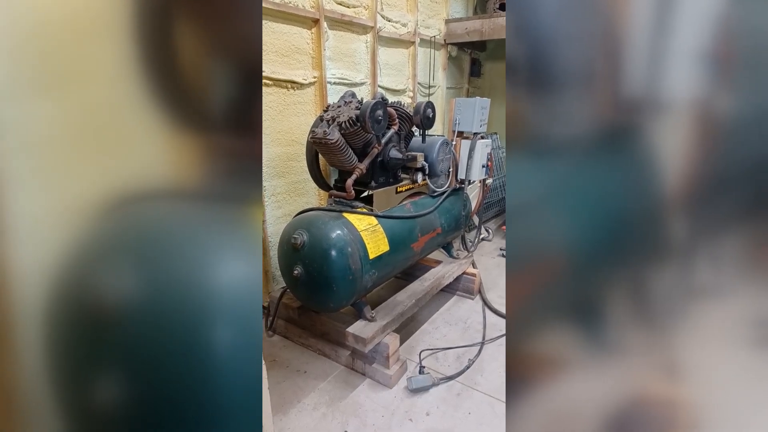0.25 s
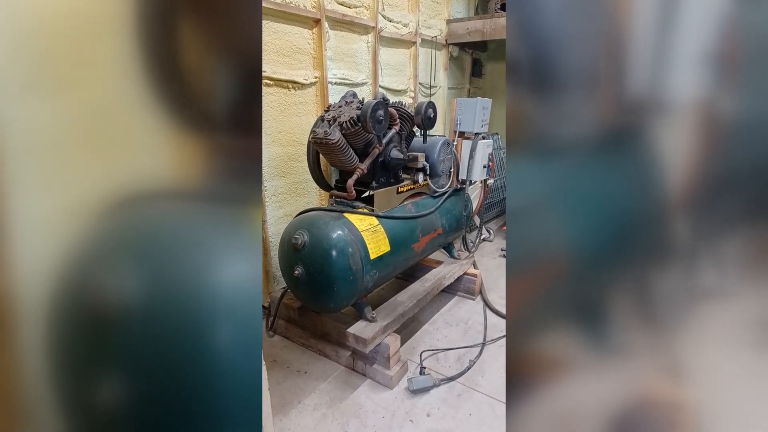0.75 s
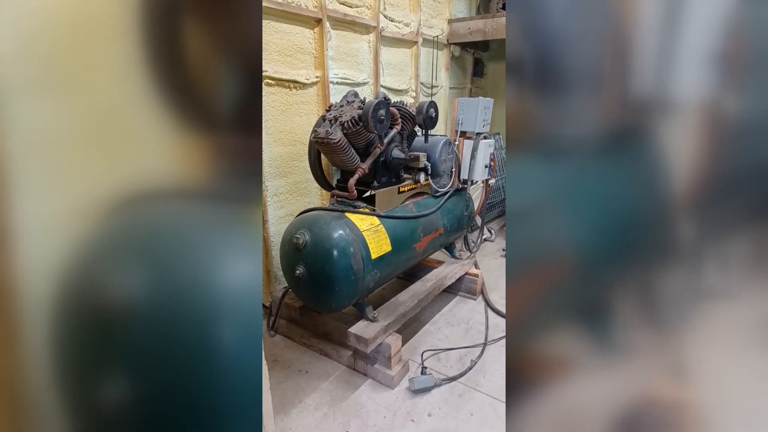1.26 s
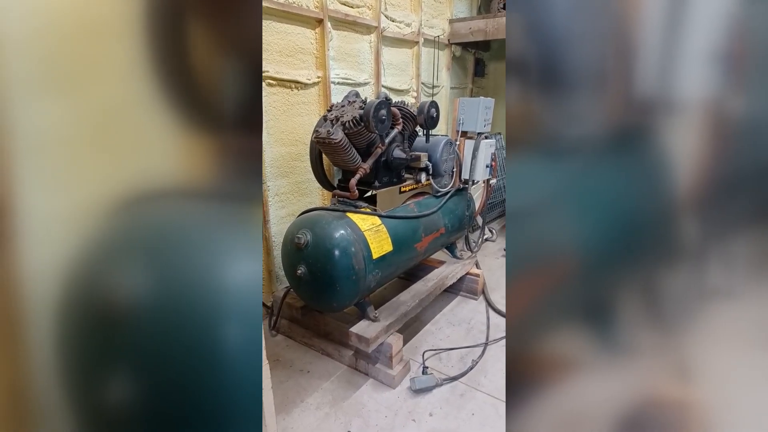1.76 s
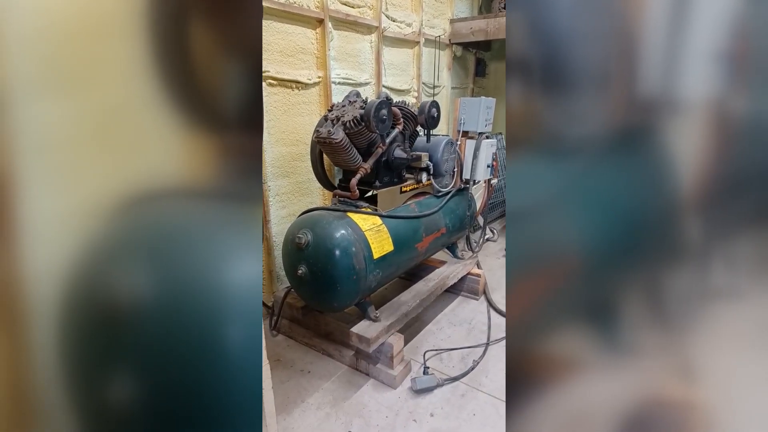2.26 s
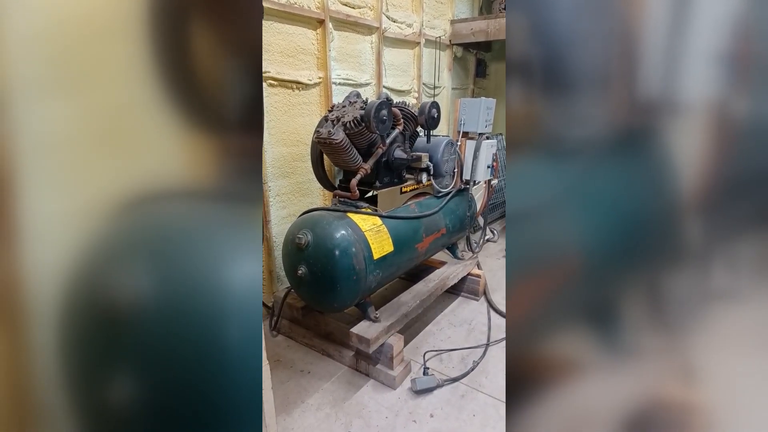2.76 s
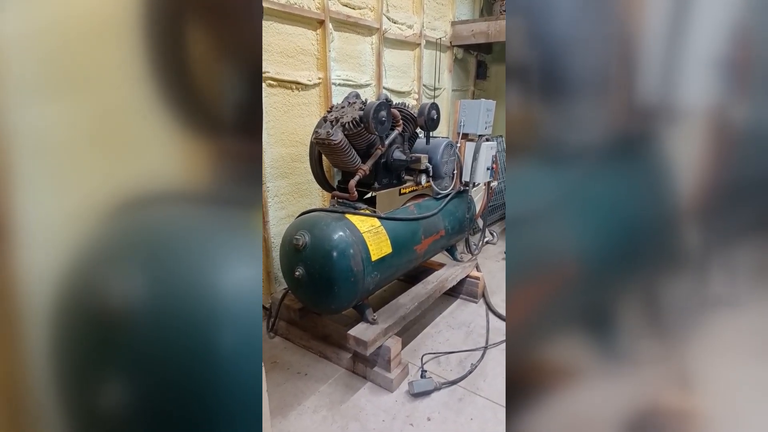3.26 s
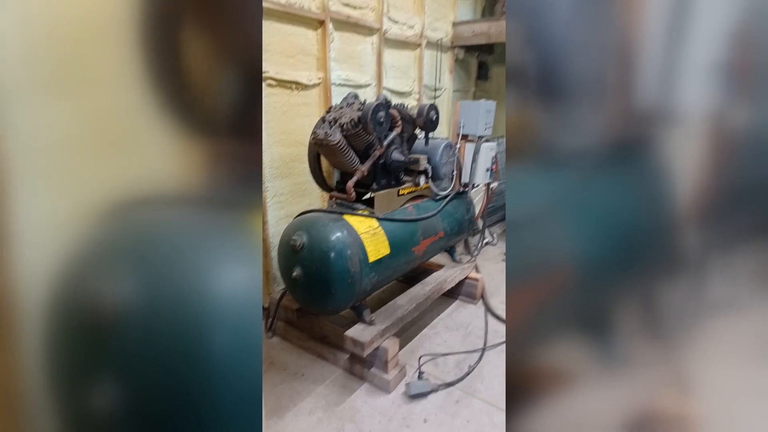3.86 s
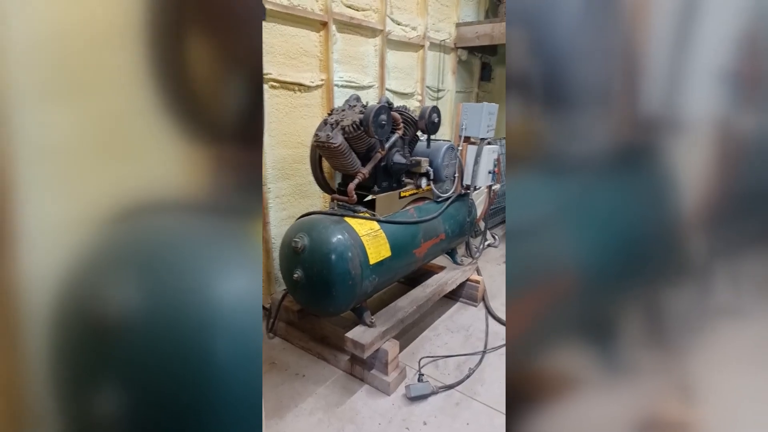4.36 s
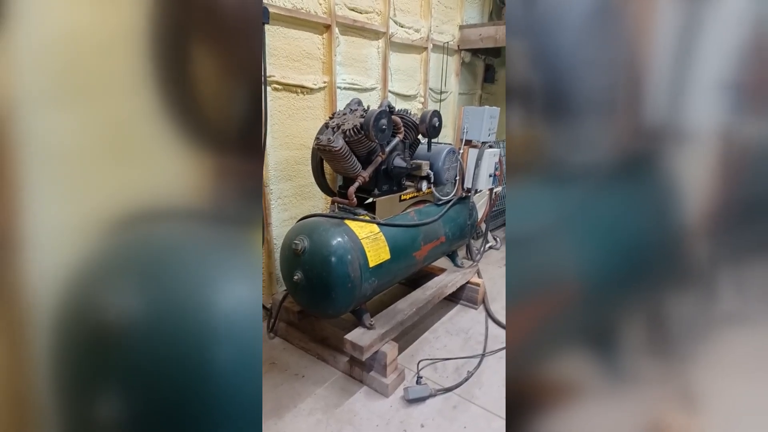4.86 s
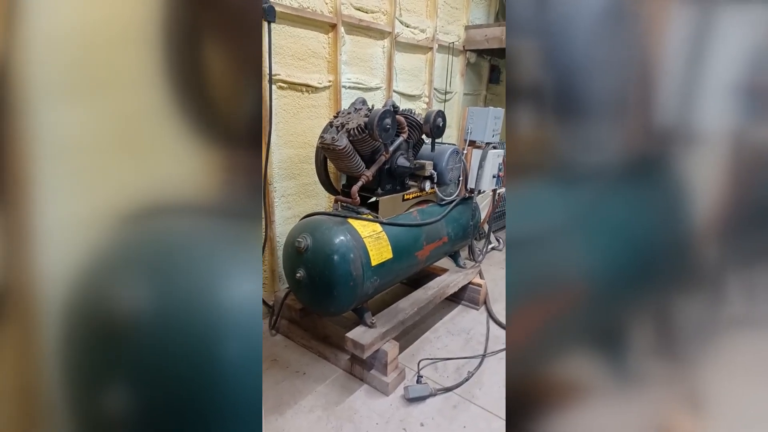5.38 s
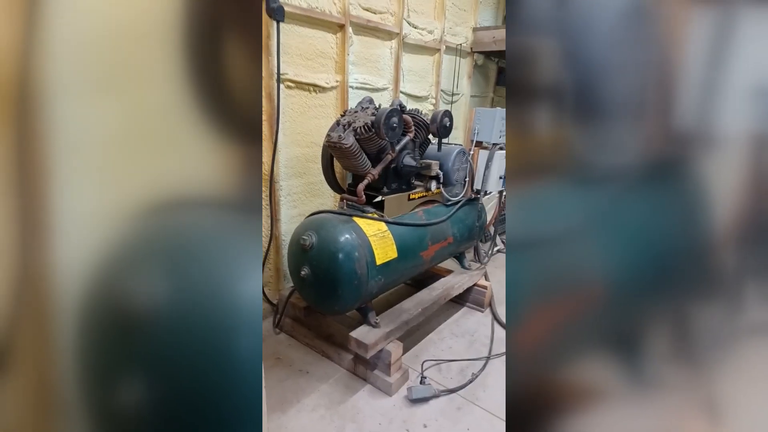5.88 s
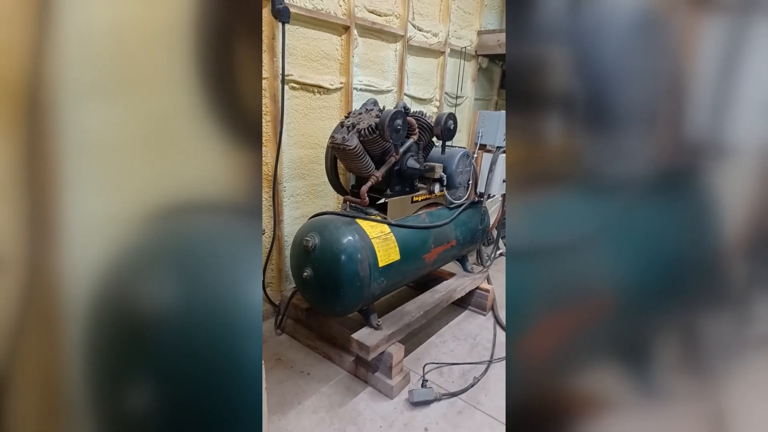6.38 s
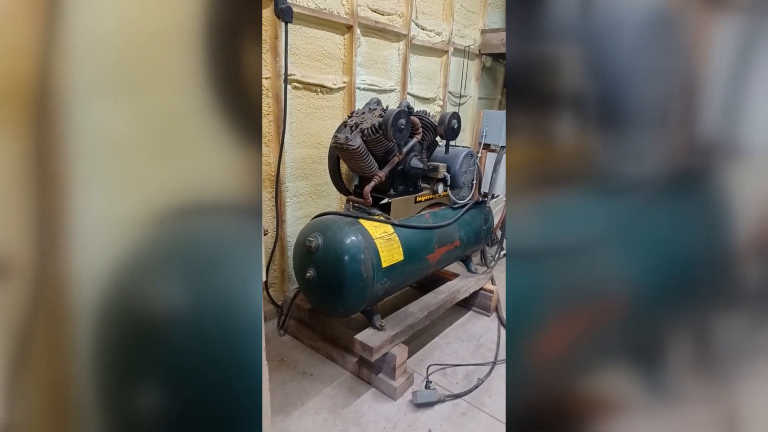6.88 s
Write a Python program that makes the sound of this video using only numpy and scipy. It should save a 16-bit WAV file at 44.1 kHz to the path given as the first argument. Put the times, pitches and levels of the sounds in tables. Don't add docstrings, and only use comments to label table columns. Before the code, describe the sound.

From 0 to about 7 seconds a belt-driven, two-cylinder electric air compressor runs without pause, already at full speed. Its crank turns roughly nine and a half times a second, making a rapid, even chugging. Each turn repeats several closely spaced knocks: a tank thump, a low intake gulp and harder metallic raps from the heads, ringing briefly from low to middle pitch. Short bright puffs of valve air hiss between and over them. A steady motor hum near 240 hertz and faint shaft tones lie underneath, with broad fan and belt noise gently throbbing at crank rate. The boarded workshop adds short, close reflections. The microphone is a few metres away, in wide stereo, with deep bass trimmed. The finest hiss dulls slightly around 3.5 seconds, dips near 6, brightens around 6.6, then fades toward the end while the machine keeps running.

```python
import sys
import numpy as np
from scipy import signal
from scipy.fft import rfft, irfft, next_fast_len
from scipy.io import wavfile

SR = 44100
rng = np.random.default_rng(int(sys.argv[2]) if len(sys.argv) > 2 else 0)


def generate_wav(signal):
    frames = np.transpose(np.atleast_2d(signal))
    scaled = np.clip(frames, -1, 1) * 32767
    pcm = np.round(scaled).astype(np.int16)
    wavfile.write(sys.argv[1], SR, pcm)


def amplitude_ratio(level_db):
    exponent = np.asarray(level_db, float) / 20
    return 10 ** exponent


N = 314433
CRANK_HZ, MAINS_HZ = 9.4966, 60.01
RUN_IN_TURNS = 4
LEFT_RIGHT = np.array([[1], [-1]])


def at_hz(points, hz):
    point_hz, level_db = np.array(points).T
    return np.interp(np.log(hz + 1), np.log(point_hz), level_db)


def rms_one(x):
    return x / np.sqrt(np.mean(x ** 2) + 1e-20)


def drift(rate_hz):
    pole = np.exp(-80 * np.pi * rate_hz / SR)
    draws = rng.standard_normal(N // 40 + 4002)
    slow = signal.lfilter([1], [1, -2 * pole, pole * pole], draws)[4000:]
    return np.interp(np.arange(N) / 40, np.arange(len(slow)), rms_one(slow))


def crank(wobble_s):
    return (np.arange(N) / SR + wobble_s * drift(0.93)) * CRANK_HZ


def since(turns, start_s):
    shifted = turns - start_s * CRANK_HZ + RUN_IN_TURNS + 2
    return shifted % 1 / CRANK_HZ, shifted.astype(int)


def ring(clicks, hz, t60_s):
    decay, angle = amplitude_ratio(-60 / (t60_s * SR)), 2 * np.pi * hz / SR
    poles = [1, -2 * decay * np.cos(angle), decay * decay]
    return signal.lfilter([0, np.sin(angle)], poles, clicks + 1e-18)


# start_s, intake_db, tank_db, heads_db
KNOCKS = [
    (.0939, -50, 0, -21),
    (.0122, 0, -50, -21),
    (.0287, -50, -50, -19),
    (.0560, -4, -14, -30),
    (.0771, -17, -50, -31),
]
# pitch_hz, level_db, t60_s
INTAKE = [(73.3, -27.5, 0.13), (94, -18, 0.018), (145.6, -20.5, 0.16), (194, -17, 0.016), (133.3, -50, 0.6),
          (185.7, -25.5, 0.24)]
TANK = [(247.2, -15.5, 0.18), (293.7, -21, 0.15), (219.3, -17, 0.2), (260.5, -21, 0.74), (313, -49, 0.042)]
HEADS = [(373, -3.5, 0.038), (418.5, -9, 0.063), (438.6, -13.5, 0.25), (504.4, -19.5, 0.15), (588, -5, .03),
         (715, -18, 0.06), (382.1, -8.5, 0.33), (467, -18.5, 0.16), (398.7, -20.5, .2), (661, -17.5, .12),
         (513.3, -12, .1),
         (760, -52, 0.085), (843, -20, 0.081), (1084, -9, 0.029), (1235, -15, 0.04), (1501, -12, 0.043)]


def knocks(turns, spread_db):
    lead = np.arange(-RUN_IN_TURNS, 0, CRANK_HZ / SR)
    turns = np.concatenate([turns[0] + lead, turns])
    out, rise_s = np.zeros(len(turns)), .02
    for body, modes in enumerate((INTAKE, TANK, HEADS)):
        clicks = np.zeros(len(turns))
        for start_s, *levels_db in KNOCKS:
            at = np.flatnonzero(np.diff(since(turns, start_s)[1]))
            turn_db = spread_db * rng.standard_normal(80)[:len(at)]
            clicks[at] += amplitude_ratio(levels_db[body] + turn_db)
        for k, (hz, level_db, t60_s) in enumerate(modes):
            swell = ring(ring(clicks, hz, t60_s), hz, rise_s) * 14 / (rise_s * SR)
            out += (-1) ** k * amplitude_ratio(level_db) * swell
    return out[-N:]


def workshop(x, t60_s, side_db, side_hz):
    age = np.arange(SR // 3) / SR
    echo = rng.standard_normal(len(age)) * amplitude_ratio(-60 * age / t60_s) * (age > .004)
    echo /= np.sqrt(np.sum(echo ** 2))
    echo = signal.sosfilt(signal.butter(1, side_hz, "high", fs=SR, output="sos"), echo)
    return x + amplitude_ratio(side_db) * signal.fftconvolve(x, echo)[:N] * LEFT_RIGHT


# pitch_hz,
# width_hz, level_db, dying_s
FRONT_OUTLET = [(12800, 850, -27, 0.015), (13760, 2000, -25, 0.0095), (6960, 730, -25.5, 0.014),
                (7740, 380, -34, 0.013), (10300, 260, -33, 0.012)]
FRONT_INLET = [(12800, 600, -33, 0.032), (1380, 1350, -29.5, 0.013)]
REAR_OUTLET = [(13700, 1800, -34, 0.031), (7550, 83, -30.5, 0.0097), (1070, 340, -23, 0.0029)]
COOLER_PIPE = [(3400, 5100, -30, 0.01), (5660, 1160, -31, 0.019), (5940, 190, -37.5, 0.049)]
CHECK_VALVE = [(12430, 440, -32, 0.011)]
REAR_INLET = [(7670, 284, -24.5, 0.0048), (9550, 530, -33, 0.011), (6950, 360, -57, 0.0027),
              (6020, 530, -38.5, 0.021)]
# start_s, passage
VALVES = [(0.096, FRONT_OUTLET), (0.015, FRONT_INLET), (0.02, REAR_OUTLET), (.034, COOLER_PIPE),
          (.047, CHECK_VALVE), (.069, REAR_INLET)]
# pitch_hz, left_over_right_db
VALVE_LEAN = [(1350, 4.5), (3300, -1), (5630, -3.5), (6500, 0), (7550, 7.5), (10500, -4), (13500, -8)]
# time_s, level_db
FACING = [(0, -36), (2.2, -36), (3.0, -37), (3.55, -41), (4.4, -37.5), (5.2, -39), (5.8, -36.5), (6.1, -44),
          (6.6, -35), (7.13, -47)]


def valves(turns, spread_db, flutter_db, flutter_hz):
    time_s, facing_db = np.transpose(FACING)
    facing_db = np.interp(np.arange(N) / SR, time_s, facing_db - facing_db.mean())
    beam, spill = amplitude_ratio(2.2 * facing_db - 2.5), amplitude_ratio(-0.088 * facing_db)
    white, out = rng.standard_normal((2, N)), np.zeros((2, N))
    for start_s, passage in VALVES:
        age, turn = since(turns, start_s)
        flutter = amplitude_ratio(flutter_db * np.sin(2 * np.pi * flutter_hz * age))
        reed = (1 - np.exp(-age / 0.0036)) * flutter
        for hz, width_hz, level_db, dying_s in passage:
            puff = amplitude_ratio(spread_db * rng.standard_normal(80))[turn]
            gate = reed * np.exp(-age / dying_s) * puff
            edges_hz = [hz - width_hz / 2, hz + width_hz / 2]
            band = signal.butter(2, edges_hz, "band", fs=SR, output="sos")
            white = np.roll(white, 5003, axis=1)
            hiss = np.sqrt(SR / 2.2 / width_hz) * signal.sosfilt(band, white)
            place = beam if hz > 13400 else spill if hz > 5000 else 1
            lean = amplitude_ratio(at_hz(VALVE_LEAN, hz) / 2 * LEFT_RIGHT)
            out += amplitude_ratio(level_db) * lean * (place * gate * hiss)
    return out


# multiple of the mains, level_db (rms)
HUM = [(2.0, -58), (4.0, -24.4), (6.0, -54), (8.0, -47)]


def motor(turns, load_depth, load_swing, load_s, mains_lead_s):
    load = 2 * np.pi * (turns - load_s * CRANK_HZ)
    cycle = 2 * np.pi * MAINS_HZ * (np.arange(N) / SR + mains_lead_s)
    cycle += load_swing * np.sin(load) + .03 * drift(1.5)
    hum = sum(np.sqrt(2) * amplitude_ratio(level_db) * np.cos(k * cycle) for k, level_db in HUM)
    return hum * (1 + load_depth * np.cos(load)) * amplitude_ratio(.6 * drift(3.0))


# pitch_hz, level_db (rms)
SHAFT = [(64.3, -60), (110.7, -58), (293.1, -47), (315.9, -56), (328, -56), (362.7, -49)]


def shaft():
    time = np.arange(N) / SR
    tones = np.zeros(N)
    for hz, level_db in SHAFT:
        tones += np.sqrt(2) * amplitude_ratio(level_db) * np.sin(2 * np.pi * (hz * time + rng.random()))
    return tones * amplitude_ratio(1.5 * drift(0.45))


# pitch_hz, level_db
CASING = [(30, -12), (70, -2), (100, 0), (128, 10), (165, 3), (205, 11), (375, 6), (450, 0)]
# pitch_hz, level_db (per Hz)
FAN_BED = [(450, -22), (630, -21),
           (900, -20), (1100, -16.5), (1500, -19), (2300, -23), (4500, -26.5)]
# pitch_hz, level_db
TREBLE = [(6450, -3), (6900, 5.5), (8600, -7.5), (10400, -1.5), (12700, 2.5)]
# pitch_hz, likeness (0 to 1)
LIKENESS = [(60, 0.83), (150, 1), (380, 1), (700, 1), (1100, 0.067), (2380, 0.01), (15000, 0.01)]
# pitch_hz, left_over_right_db
LEAN = [(60, -5), (120, -4), (240, -9), (480, 21.5), (950, -1.5), (3770, -1), (7520, 1.5), (15000, -5.5)]


def bed(turns, level_db, throb_db, throb_s):
    size = next_fast_len(N)
    hz = np.fft.rfftfreq(size, 1 / SR)
    microphone = [(5800, 0)] + TREBLE + [(14400, -1), (15900, -3)]
    colour_db = at_hz(CASING, hz) + at_hz(FAN_BED, hz) + at_hz(microphone, hz)
    mid, side = rfft(rng.standard_normal((2, size))) * amplitude_ratio(colour_db)
    alike = np.clip(at_hz(LIKENESS, hz), 0, 1)
    lean = amplitude_ratio(at_hz(LEAN, hz) / 2 * LEFT_RIGHT)
    ears = np.sqrt(1 + alike) * mid + np.sqrt(1 - alike) * side * LEFT_RIGHT
    noise = irfft(lean * ears, size)[:, :N]
    turning = np.cos(2 * np.pi * (turns - throb_s * CRANK_HZ))
    return amplitude_ratio(level_db) * noise * amplitude_ratio(throb_db * turning + .5 * drift(1.5))


def scene():
    turns = crank(wobble_s=.0002)
    pump = workshop(knocks(turns, spread_db=0.45), t60_s=0.23, side_db=1.5, side_hz=2400)
    air = valves(turns, spread_db=.9, flutter_db=1.5, flutter_hz=114)
    hum = motor(turns, load_depth=0.3, load_swing=0.05, load_s=0.097, mains_lead_s=.0018)
    machine = (pump + hum + shaft()) * amplitude_ratio(-.1 * LEFT_RIGHT)
    return machine + air + bed(turns, level_db=-6, throb_db=1.05, throb_s=0.033)


def low_pass(x):
    return signal.sosfilt(signal.butter(12, 15960, fs=SR, output="sos"), x)


def record(dry):
    bass_cut = signal.butter(3, 60, "high", fs=SR, output="sos")
    top_cut = signal.cheby2(10, 50, 16250, fs=SR, output="sos")
    mix = signal.sosfilt(np.vstack([bass_cut, top_cut]), dry)
    return low_pass(mix)


dry = scene()
out = record(dry)
generate_wav(out)
```